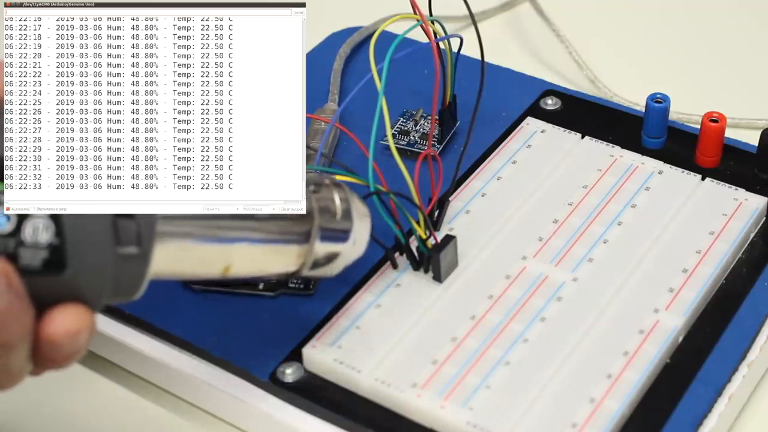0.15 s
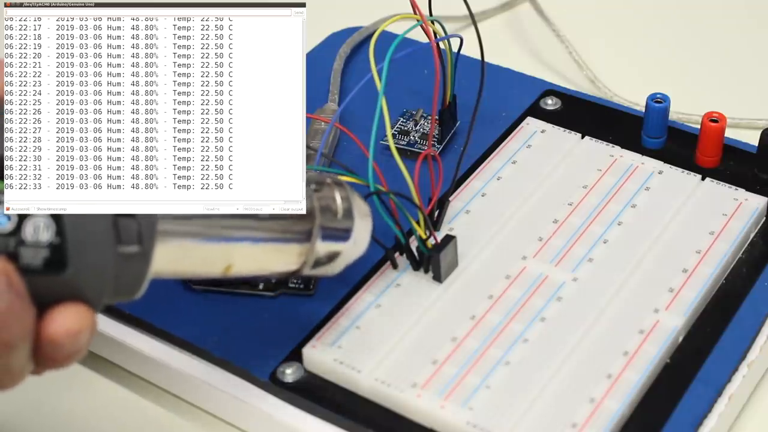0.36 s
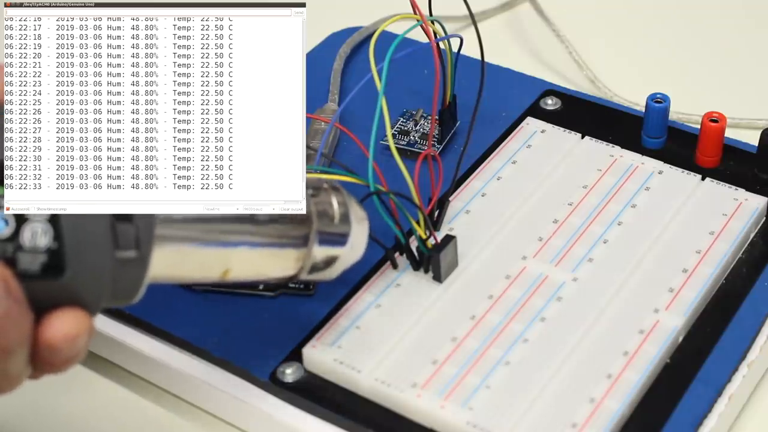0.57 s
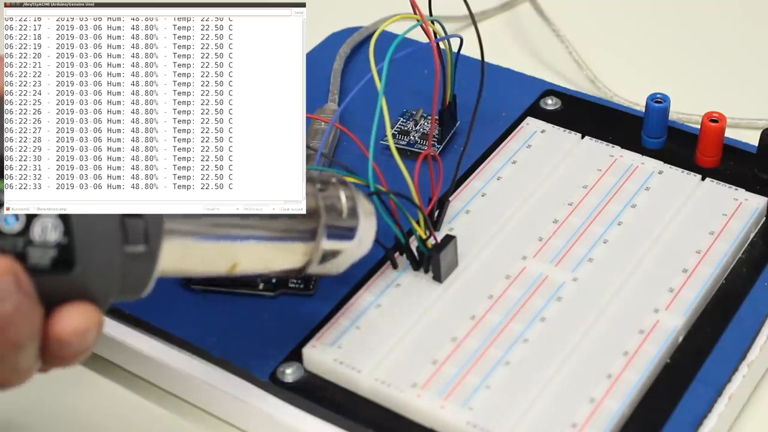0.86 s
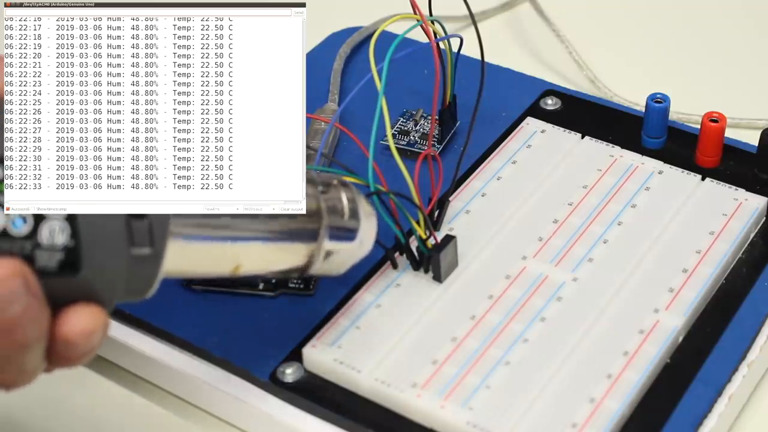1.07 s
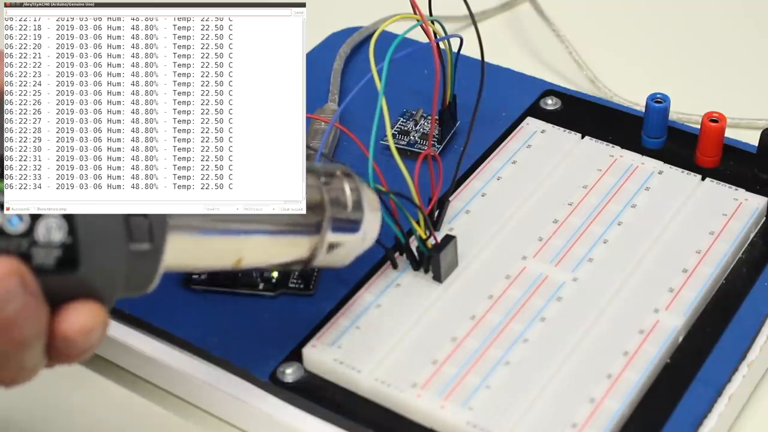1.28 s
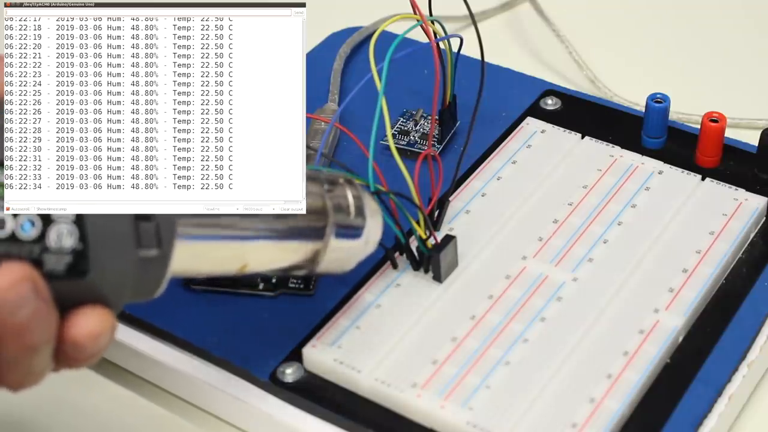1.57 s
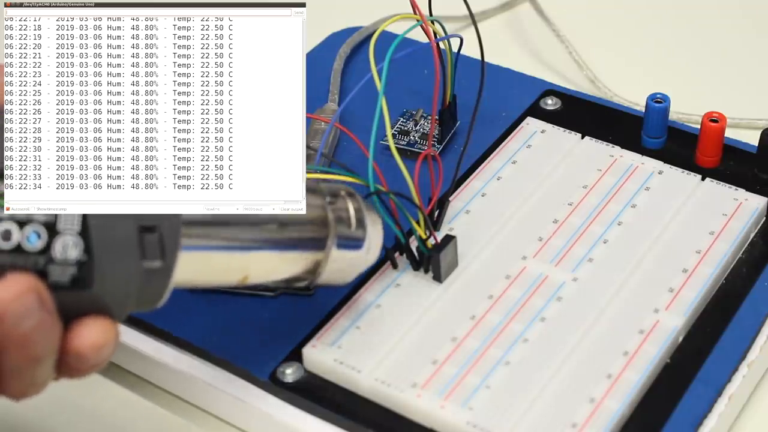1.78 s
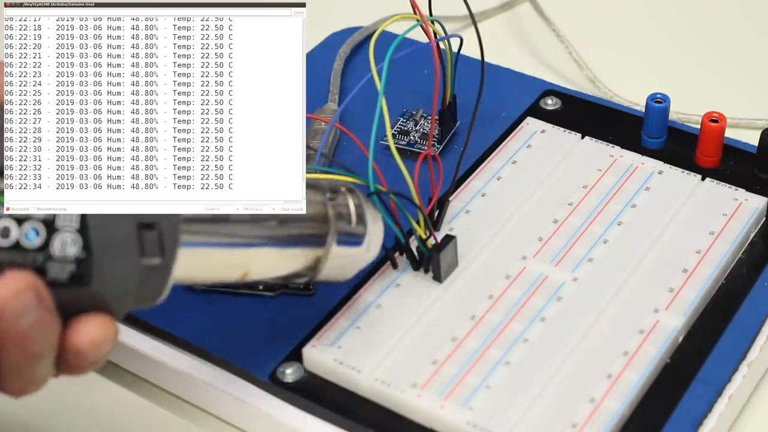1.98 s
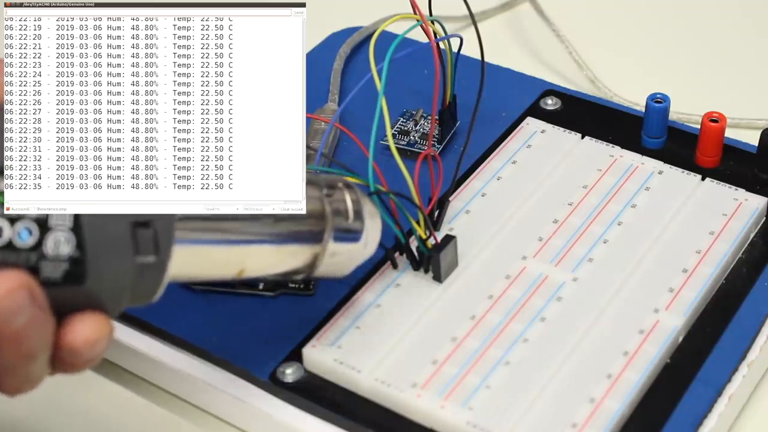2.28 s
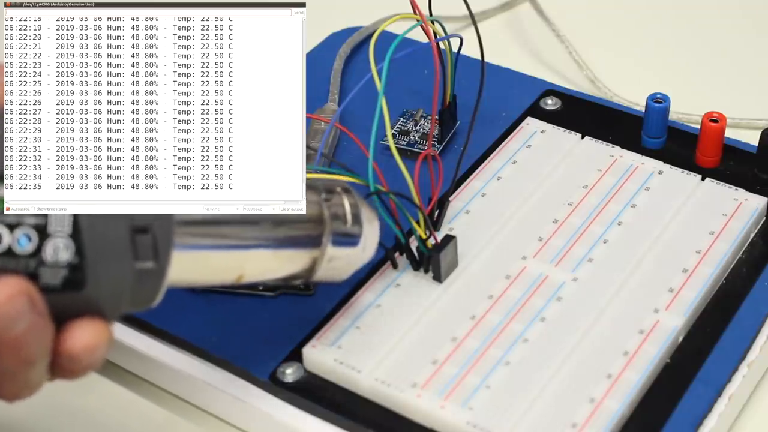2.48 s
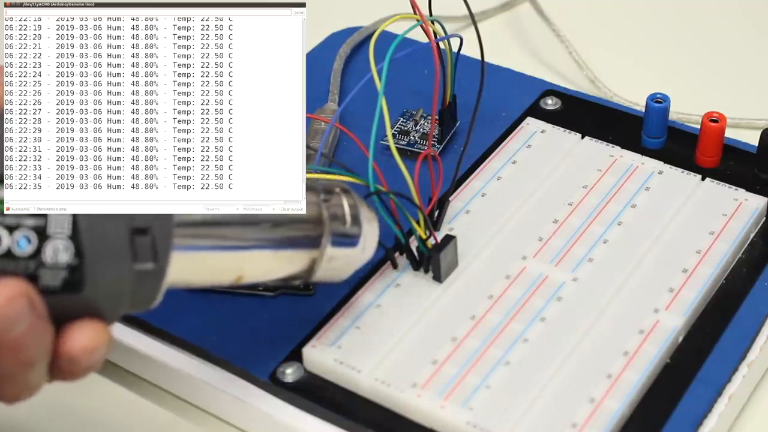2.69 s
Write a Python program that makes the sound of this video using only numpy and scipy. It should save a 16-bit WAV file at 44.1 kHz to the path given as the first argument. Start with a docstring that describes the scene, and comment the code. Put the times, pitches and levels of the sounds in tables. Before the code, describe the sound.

A handheld heat gun runs without a break, its motor whine layered over a hollow rush of air, pitch creeping up very slightly; close stereo microphones at an indoor workbench, with faint mains hum beneath.

```python
"""A handheld heat gun blows over a workbench, close to a stereo microphone pair. From the start: shaft-speed
multiples whine, air rushes through the housing (noise coloured, loudest just under 1 kHz), mains hum is faint.
The shaft mostly gains speed and the image leans right as the hand turns the gun.
Near 1.1 s low-passed noise makes one brief deep rumble; near 2.2 s, at top speed, the higher whine swells."""
import sys
import numpy as np
from scipy import signal
from scipy.fft import rfft, irfft, next_fast_len
from scipy.io import wavfile
from scipy.ndimage import uniform_filter1d

SR = 44100
rng = np.random.default_rng(int(sys.argv[2]) if len(sys.argv) > 2 else 0)


def wrap_up_sound(samples):
    """Save the sound to the file named by the first command line argument, as 16-bit audio."""
    columns = np.atleast_2d(samples).T
    # keep every value between -1 and 1, then stretch to whole-number steps
    tamed = np.clip(columns, -1, 1)
    steps = np.round(tamed * 32767).astype(np.int16)
    wavfile.write(sys.argv[1], SR, steps)


N = 125685
TIME_S = np.arange(N) / SR
LEFT_RIGHT = np.array([[.5], [-.5]])  # splits a left-over-right difference between the channels


def amp(db):
    """Gain of a level in dB."""
    return 10 ** (np.asarray(db) / 20)


def unit(x):
    """Scaled to rms 1."""
    return x / np.sqrt(np.mean(x ** 2) + 1e-20)


def along(points, hz):
    """(frequency_hz, value) points interpolated on a log frequency axis."""
    point_hz, value = np.transpose(points)
    return np.interp(np.log(hz + 1), np.log(point_hz + 1), value)


def curve(points):
    """(time_s, value) points interpolated to one value per sample."""
    return np.interp(TIME_S, *np.transpose(points))


def wobble(rate_hz):
    """Smooth random curve, rate_hz knots a second."""
    knots = rng.standard_normal(256)
    return np.interp(TIME_S * rate_hz, np.arange(len(knots)), knots)


def bump(middle_s, half_length_s):
    """Gaussian rise and fall, peak 1."""
    return np.exp(-((TIME_S - middle_s) / half_length_s) ** 2)


def filtered(x, response):
    """x times a complex response of frequency, zero-padded."""
    size = next_fast_len(N + SR // 2)
    hz = np.fft.rfftfreq(size, 1 / SR)
    return irfft(rfft(x, size) * response(hz), size)[..., :N]


FLUTTER_DB, FLUTTER_RATE_HZ = 1, 6.77
BLUR_RAD, BLUR_RATE_HZ = .28, 23
SIDE_DB = -22  # left-right difference part, relative to the centre


def tone(angle, level_db):
    """Stereo sine with random phase and level wander, a little of it off centre."""
    angle = angle + rng.uniform(0, 2 * np.pi) + BLUR_RAD * wobble(BLUR_RATE_HZ)
    gain = np.sqrt(2) * amp(level_db + FLUTTER_DB * wobble(FLUTTER_RATE_HZ))
    mid = gain * np.sin(angle)
    side = gain * amp(SIDE_DB) * np.sin(angle + rng.uniform(0, 2 * np.pi))
    return np.array([mid + side, mid - side])


# Shaft speed: time_s, speed_turns_per_s
SHAFT_SPEED = [(0, 170.75), (.2, 171.0), (.3, 170.94), (.4, 171.25), (.5, 171.21), (.7, 171.41),
               (.8, 171.65), (1.1, 172.03), (1.5, 172.26), (1.7, 172.23), (1.8, 172.44), (1.9, 172.36),
               (2.0, 172.57), (2.2, 172.77), (2.3, 172.75), (2.4, 172.44), (2.6, 172.3), (2.85, 172.47)]
WAVER_RAD, WAVER_RATE_HZ = .012, 12


def shaft_angle():
    """Shaft angle in rad: integrated speed plus slightly uneven running."""
    steady = 2 * np.pi * np.cumsum(curve(SHAFT_SPEED)) / SR
    return steady + WAVER_RAD * wobble(WAVER_RATE_HZ)


# Gun direction: time_s, aim (-1 to 1)
GUN_AIM = [(0, -1), (.47, -.8), (.8, -.45), (1.1, -.1), (1.42, .3), (1.74, .6), (2.3, .9), (2.85, .75)]


def gun_aim():
    """Slow turn of the gun in the hand."""
    return curve(GUN_AIM)


# Multiples 1, 2, 3 .. of shaft speed: level_db (at aim 0), slope_db_per_aim, bend_db_per_aim_squared
LOW_WHINE = [(-43.5, -1, 0), (-60, 0, -3), (-47, 0, -6), (-56, -4, 5), (-47, -1, -1), (-30, 0, 1),
             (-38, 9, -6), (-55, 3, 5), (-50, 5, -3), (-33, 3.5, -2), (-48, -4, -6), (-41, 4, 1.5),
             (-29.8, 2.2, -1.3), (-44.5, -4, 3), (-35, -2.5, -3.5), (-48, -6, 2), (-47, -2, 4),
             (-39, 1, -2), (-38.5, 0, -4), (-33.7, -1, -5), (-51, 2, 5), (-49, -3, 0), (-50, -5, -5),
             (-53, -1, 2), (-48, 3, 2), (-51, 2, 4), (-48, -2, -4), (-48, -2, 0), (-56, 1, -4),
             (-48, -3.5, 3), (-55, -3, 3), (-46.5, 5, 1), (-48.5, 11, -1), (-55, 3, 0), (-66, 5, 0),
             (-70, 1, 6), (-65, -3, 4), (-68, -1, -1), (-53, 1, -4), (-57, -3, -3), (-53, 1, -5)]
# Multiples above those: level_db
HIGH_WHINE = [-62, -63, -64, -58, -62, -65, -64, -70, -61, -56, -60, -64, -66, -64, -71, -62, -70, -61, -65,
              -63, -64, -70, -68, -69, -65, -69, -71, -71, -76, -76, -72, -77, -67, -72, -71, -78, -73, -84,
              -80, -70, -80, -73, -78, -69]
# Tones off the whole multiples: multiple_of_shaft_speed
BETWEEN_MULTIPLE = [1.7, 7.22, 9.13, 11.7, 17.7, 20.7]
# Their levels: level_db
BETWEEN_LEVEL = [-56, -41, -42.5, -40, -58, -56]
SWELL_MIDDLE_S, SWELL_HALF_LENGTH_S, SWELL_DB = 2.24, .15, 3.5
SWELL_FIRST_MULTIPLE = 20  # swells from here to the end of LOW_WHINE


def motor(shaft, aim):
    """Motor and fan tones lock to the shaft; each low multiple radiates in its own direction."""
    swell_db = SWELL_DB * bump(SWELL_MIDDLE_S, SWELL_HALF_LENGTH_S)
    whine = np.zeros((2, N))
    for multiple, (level_db, slope, bend) in enumerate(LOW_WHINE, start=1):
        aimed_db = level_db + slope * aim + bend * aim ** 2
        if multiple >= SWELL_FIRST_MULTIPLE:
            aimed_db = aimed_db + swell_db
        whine += tone(multiple * shaft, aimed_db)
    for multiple, level_db in enumerate(np.ravel(HIGH_WHINE), start=len(LOW_WHINE) + 1):
        whine += tone(multiple * shaft, level_db)
    for multiple, level_db in zip(BETWEEN_MULTIPLE, BETWEEN_LEVEL):
        whine += tone(multiple * shaft, level_db)
    return whine


# Rush spectrum: frequency_hz, relative_level_db
HOUSING_COLOUR = [(20, -98), (55, -74), (105, -77.5), (150, -63.5), (250, -66.5), (320, -68), (480, -57.5),
                  (560, -58.5), (640, -55), (700, -58), (800, -57.5), (900, -49.5), (985, -45.5),
                  (1045, -48), (1080, -52.5), (1140, -58.5), (1330, -59), (1410, -57.5), (1500, -63.5),
                  (1640, -57), (1900, -65), (2200, -59.5), (2600, -64.5), (2720, -57.5), (2820, -67),
                  (3300, -68.5), (3800, -66), (4050, -63), (5100, -72), (5900, -75), (6550, -81.5),
                  (6900, -77), (8500, -84), (8900, -84), (10500, -84.5), (11600, -88), (12200, -88),
                  (15500, -103)]
# Narrow resonances and cancellations of housing and bench: centre_hz, width_hz, gain_db
NARROW_BANDS = [(495.5, 15, 5), (673, 6.3, -9.5), (795, 5.7, 7.5), (887, 27, 2.5), (937, 5.5, -9.5),
                (1067, 14, -8), (1646, 12, 1), (1685, 5.6, -8), (4240, 90, -5.5), (5854, 76, 8)]


def housing_gain(hz):
    """Broad colour of the housing plus narrow peaks and notches."""
    narrow_db = sum(db * np.exp(-((hz - centre) / width) ** 2) for centre, width, db in NARROW_BANDS)
    return amp(along(HOUSING_COLOUR, hz) + narrow_db)


# Rush level: time_s, level_db
RUSH_LEVEL = [(0, -22.5), (.5, -22), (1, -22.5), (1.9, -23), (2.2, -22.5), (2.85, -22.5)]
# Left-right likeness: frequency_hz, correlation
LIKENESS = [(30, .8), (100, .88), (160, .98), (320, .94), (470, .985), (540, .8), (760, .8), (860, .98),
            (1300, .98), (4000, .97), (5000, .75), (9000, .6), (15000, .5)]
PATCH_DB = .96


def air():
    """Turbulent flow: patchy noise coloured by the housing, partly alike left and right."""
    spectra = signal.stft(rng.standard_normal((2, N)), nperseg=512)[2]
    patches = rng.standard_normal(spectra.shape[1:])
    patches = uniform_filter1d(patches, size=4, axis=0)  # bins
    patches = uniform_filter1d(patches, size=10, axis=1)  # frames
    pair = signal.istft(spectra * amp(PATCH_DB * unit(patches)), nperseg=512)[1][:, :N]

    def mid_side_gain(hz):
        spread_rad = np.arccos(np.clip(along(LIKENESS, hz), -1, 1)) / 2
        return housing_gain(hz) * np.array([np.cos(spread_rad), np.sin(spread_rad)])

    mid, side = filtered(pair, mid_side_gain)
    return unit(np.array([mid + side, mid - side])) * amp(curve(RUSH_LEVEL))


# Mains hum: frequency_hz, level_db
HUM_TONES = [(60, -71.5), (120, -62)]


def hum():
    """Mains hum: steady-pitched tones, slightly unsteady in phase and level."""
    return sum(tone(2 * np.pi * hz * TIME_S, level_db) for hz, level_db in HUM_TONES)


RUMBLE_MIDDLE_S, RUMBLE_HALF_LENGTH_S = 1.07, .22
RUMBLE_DB, RUMBLE_TOP_HZ = -57, 45  # level before the envelope


def rumble():
    """Short deep swell: low-passed noise under a Gaussian envelope."""
    noise = rng.standard_normal(N)
    deep = unit(filtered(noise, lambda hz: (hz > 20) / (1 + (hz / RUMBLE_TOP_HZ) ** 4)))
    return amp(RUMBLE_DB) * deep * bump(RUMBLE_MIDDLE_S, RUMBLE_HALF_LENGTH_S)


DRIFT_DB_PER_AIM = -.4  # left over right


def scene():
    """Gun, panned by its aim, plus hum and rumble."""
    shaft, aim = shaft_angle(), gun_aim()
    gun = motor(shaft, aim) + air()
    pan = amp(DRIFT_DB_PER_AIM * aim * LEFT_RIGHT)
    return gun * pan + hum() + rumble()


# Phase difference of the ports: frequency_hz, left_lead_rad
PORT_LEAD = [(100, .08), (500, .18), (900, .04), (4000, .06), (5500, .4), (10000, 1.25), (15000, 3)]
# Level difference of the ports: frequency_hz, left_over_right_db
PORT_LEAN = [(80, .8), (170, 1.9), (230, -.4), (580, .5), (950, -1.4), (2300, 1.4), (3500, -.2)]
TOP_HZ = 15515


def record(dry):
    """Two spaced microphone ports differ in level and phase; band limit at TOP_HZ."""
    def ports(hz):
        gain = amp(LEFT_RIGHT * along(PORT_LEAN, hz))
        phase = np.exp(1j * LEFT_RIGHT * along(PORT_LEAD, hz))
        return gain * phase * (hz < TOP_HZ)

    return filtered(dry, ports)


dry = scene()
out = record(dry)
wrap_up_sound(out)
```